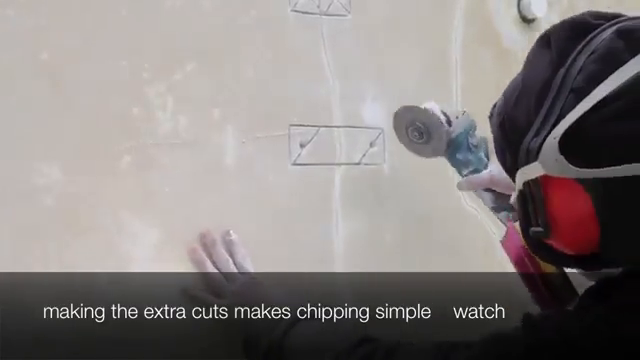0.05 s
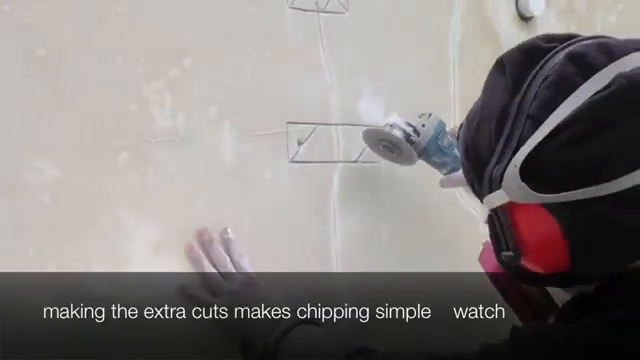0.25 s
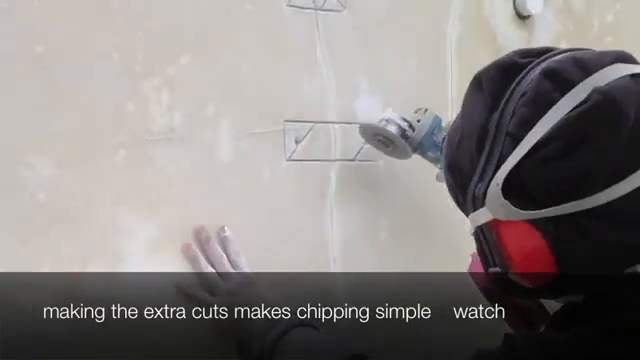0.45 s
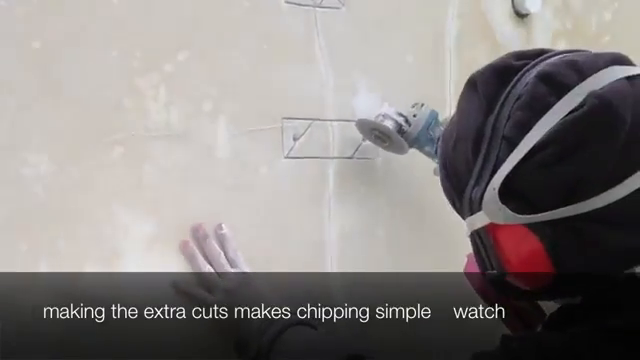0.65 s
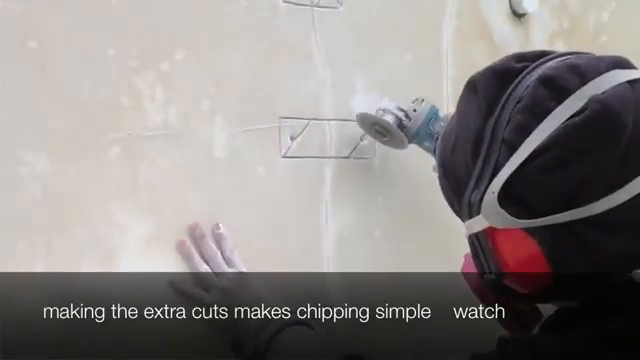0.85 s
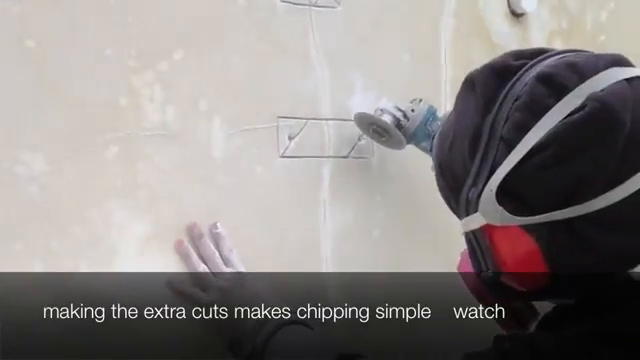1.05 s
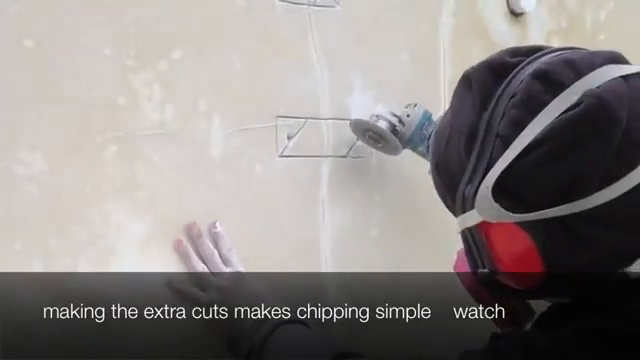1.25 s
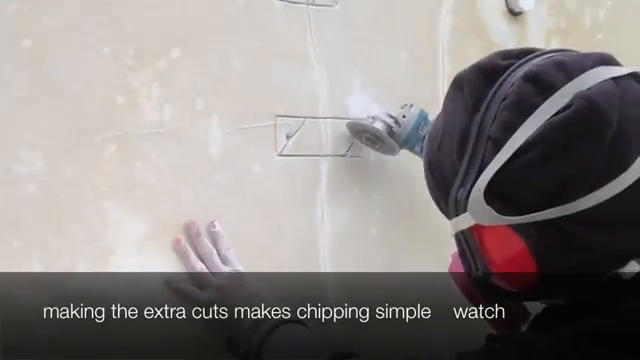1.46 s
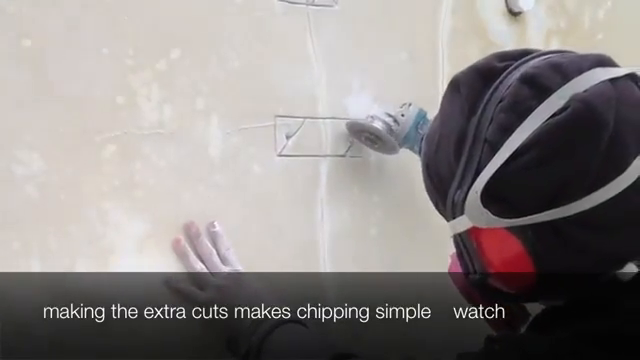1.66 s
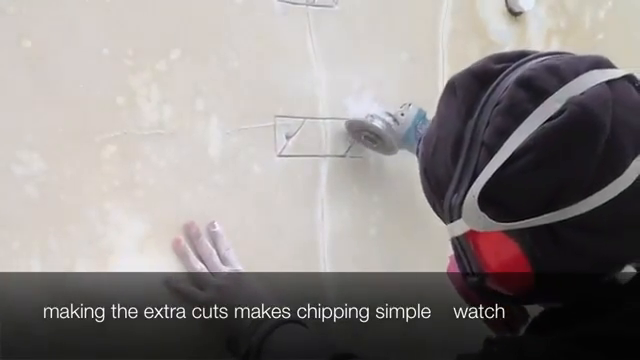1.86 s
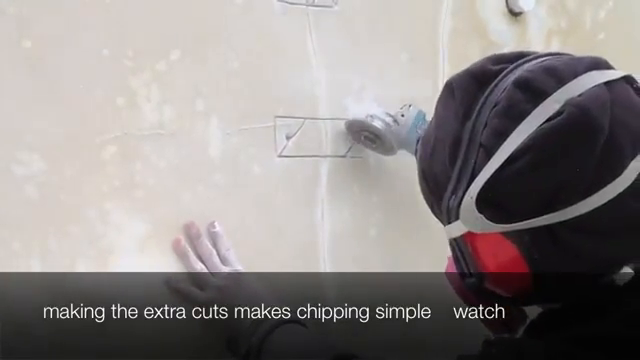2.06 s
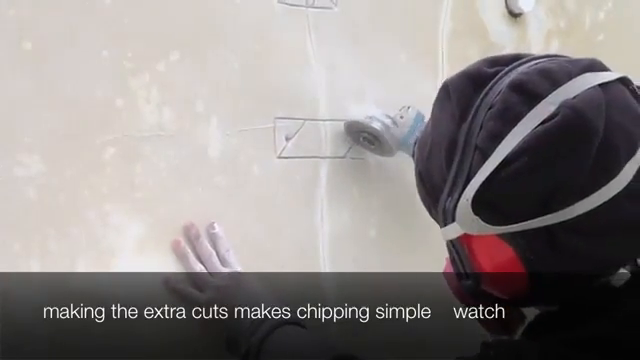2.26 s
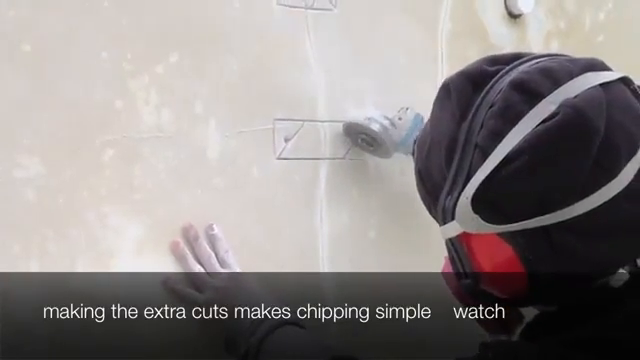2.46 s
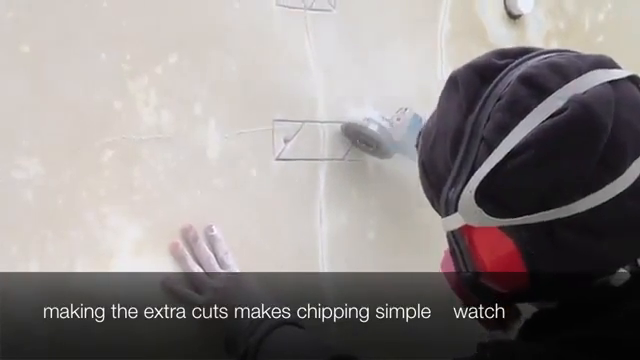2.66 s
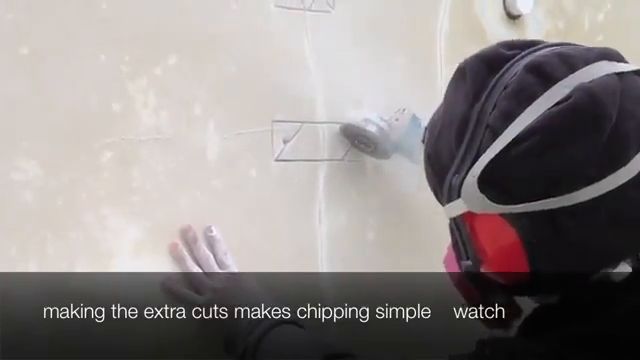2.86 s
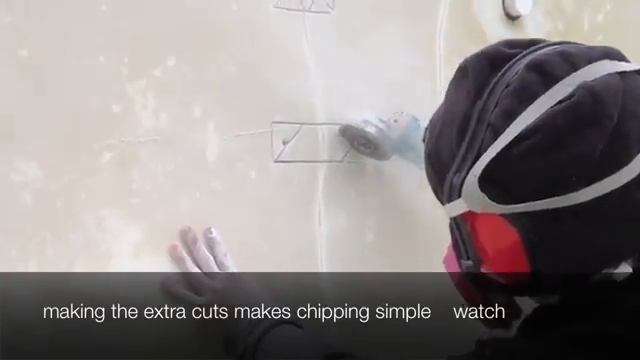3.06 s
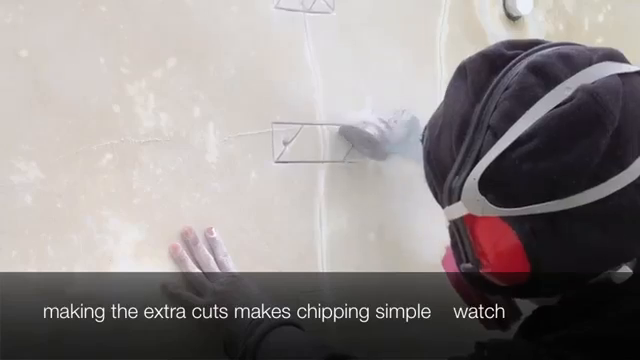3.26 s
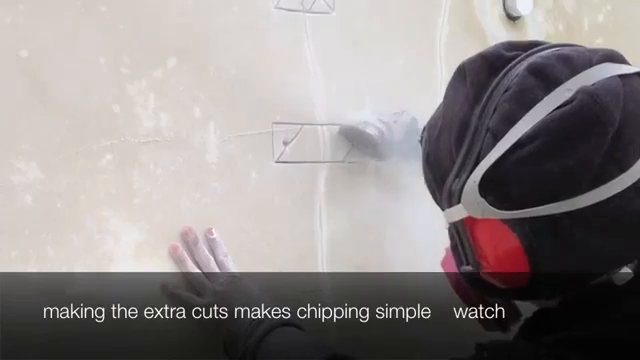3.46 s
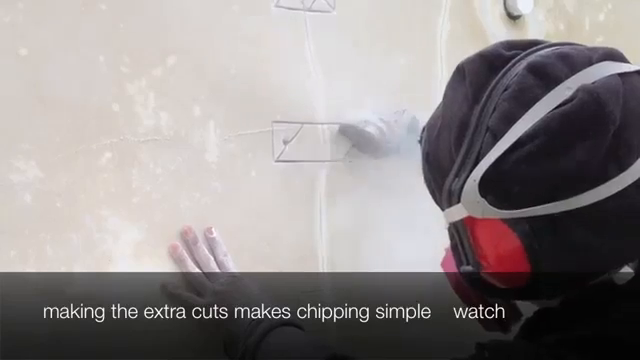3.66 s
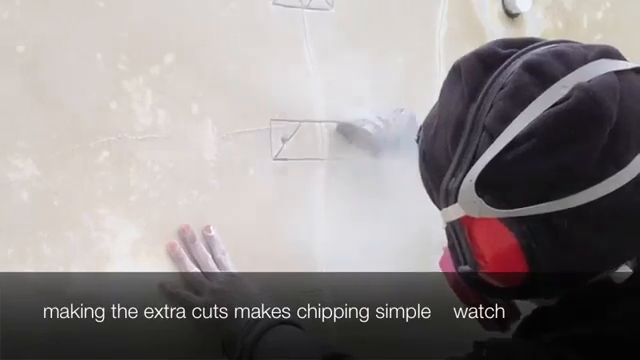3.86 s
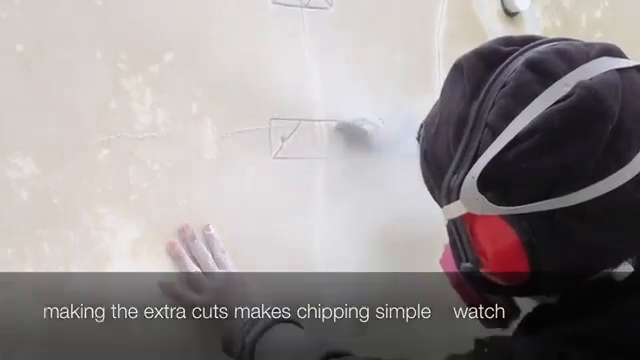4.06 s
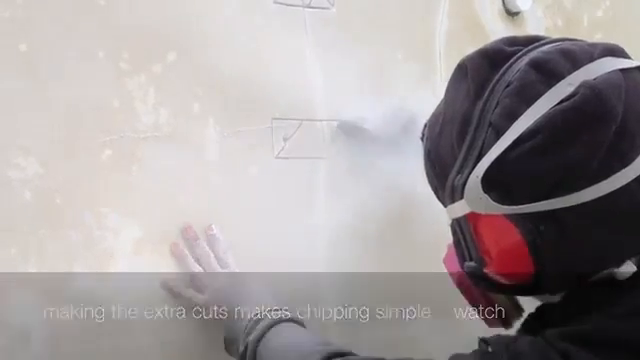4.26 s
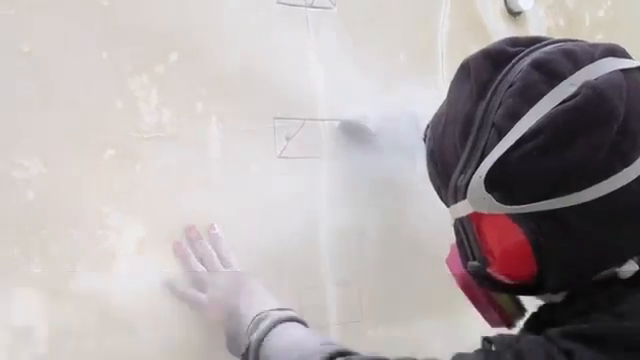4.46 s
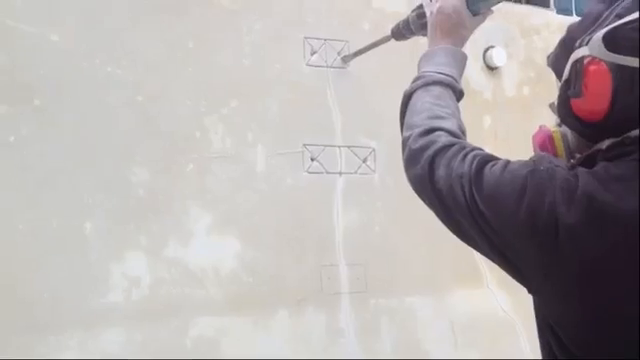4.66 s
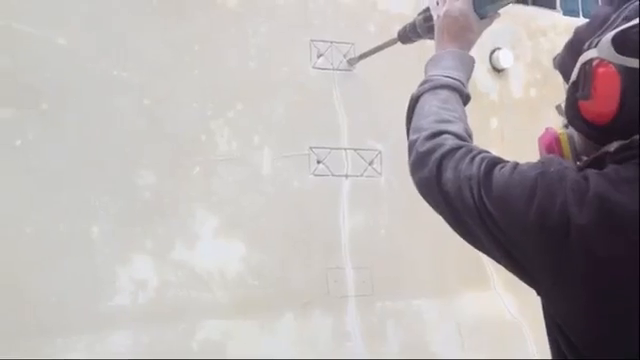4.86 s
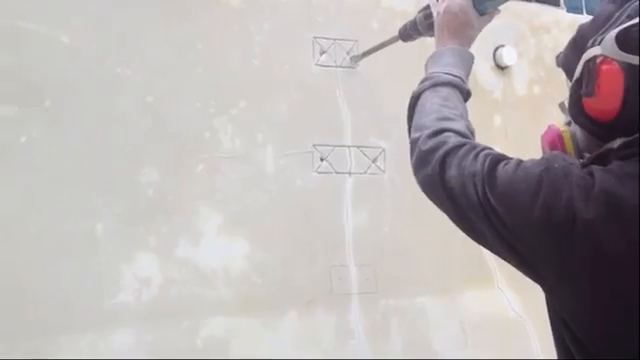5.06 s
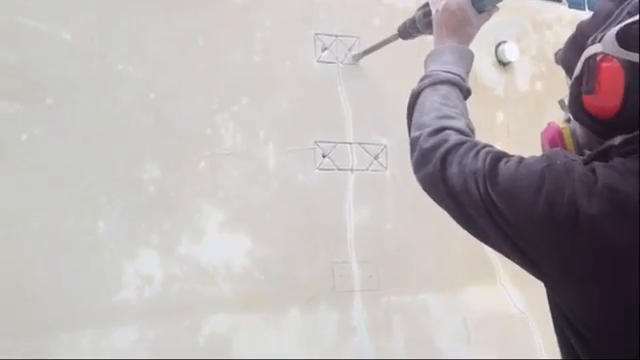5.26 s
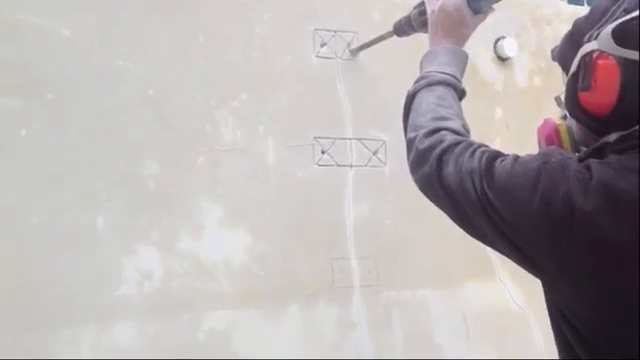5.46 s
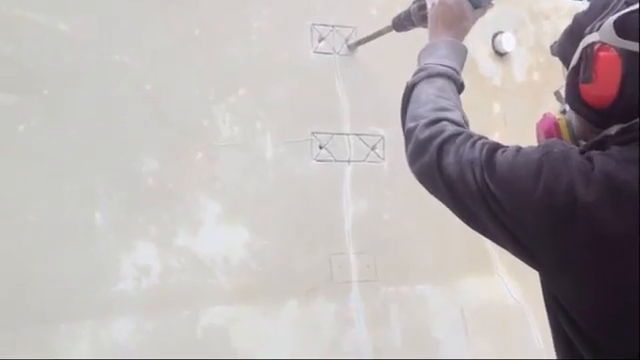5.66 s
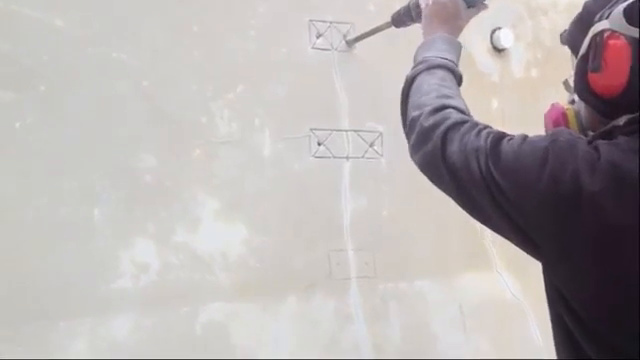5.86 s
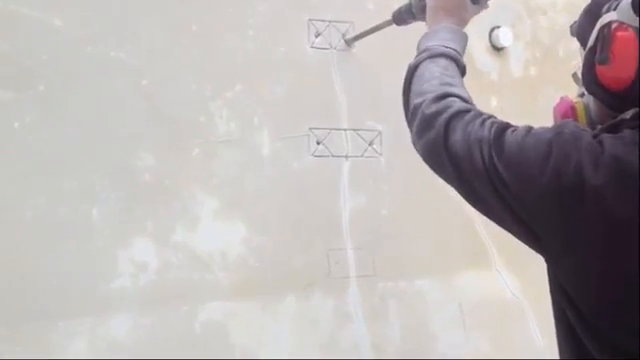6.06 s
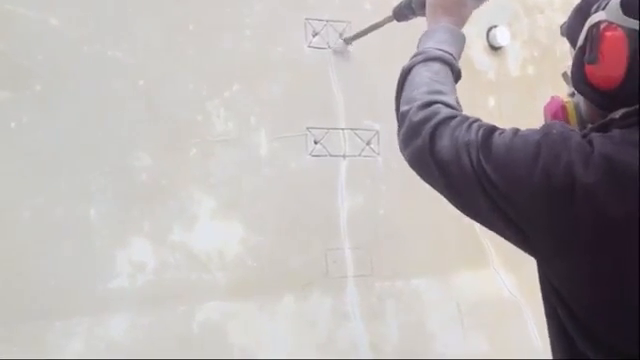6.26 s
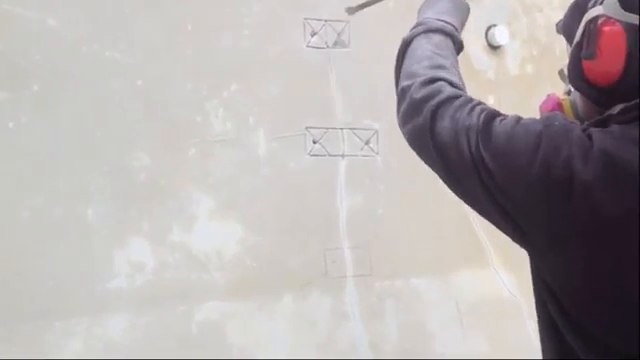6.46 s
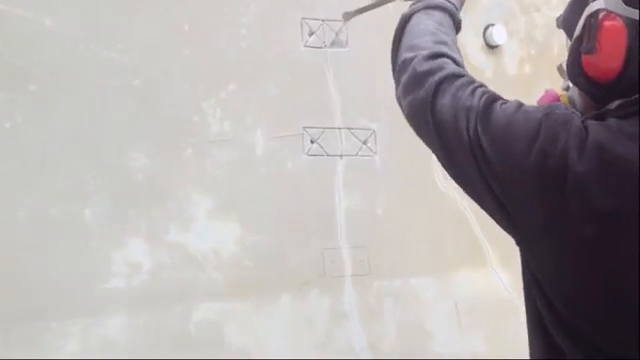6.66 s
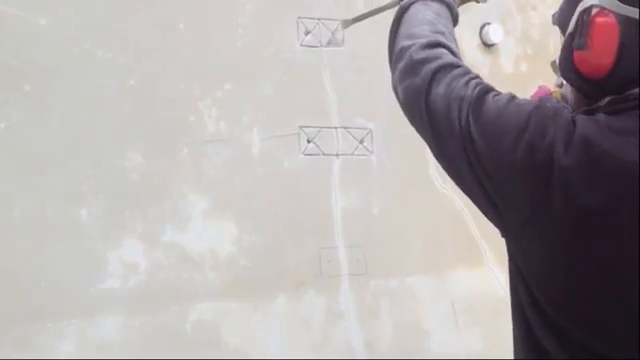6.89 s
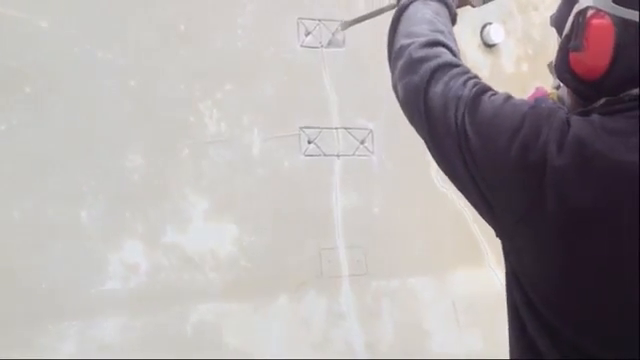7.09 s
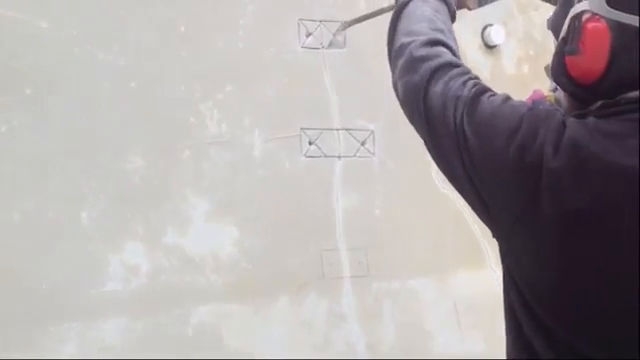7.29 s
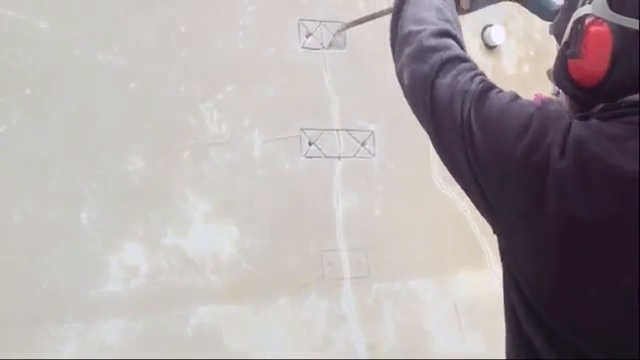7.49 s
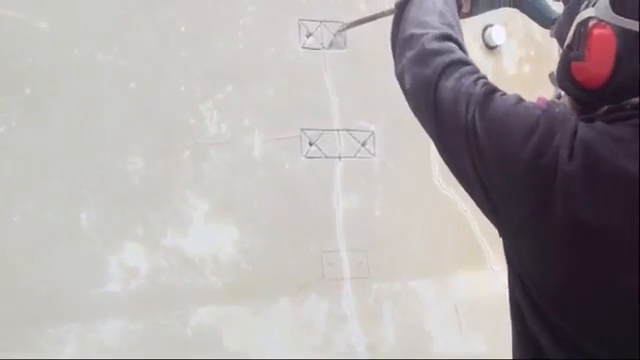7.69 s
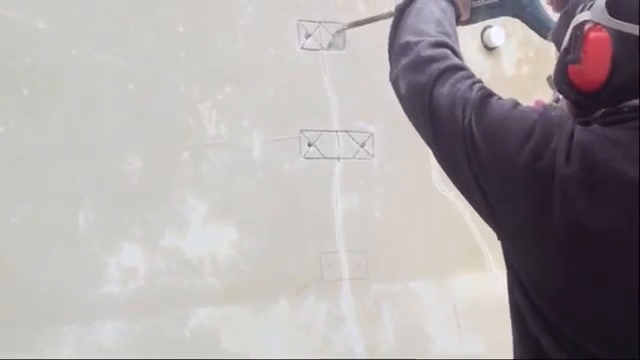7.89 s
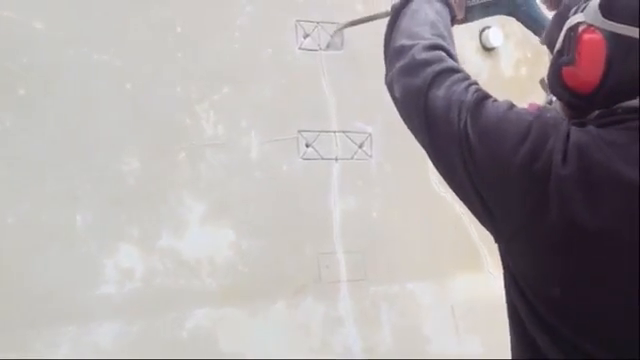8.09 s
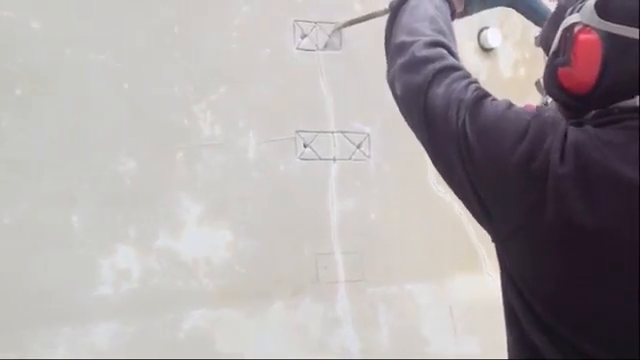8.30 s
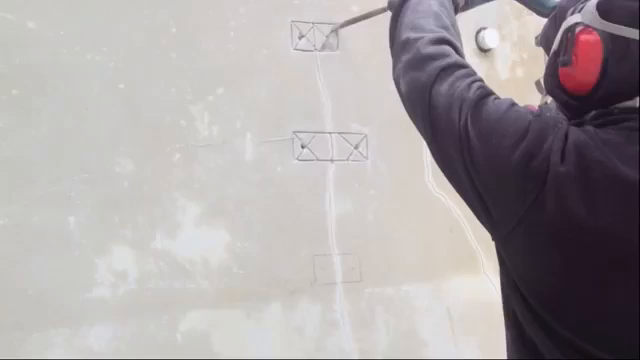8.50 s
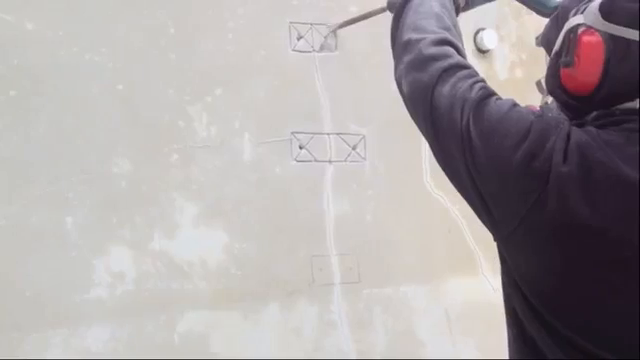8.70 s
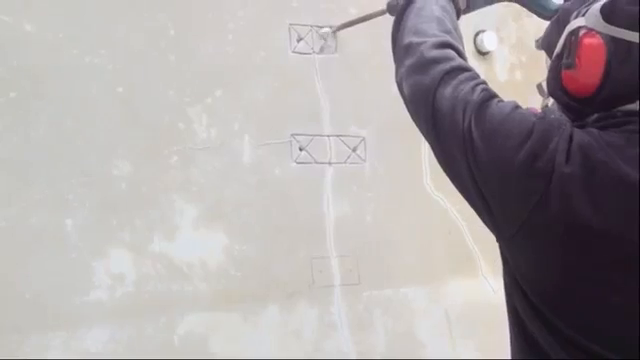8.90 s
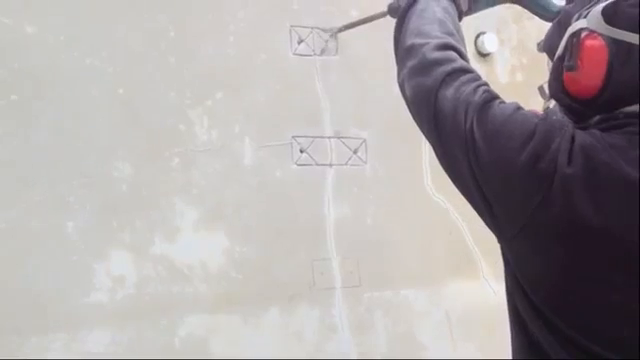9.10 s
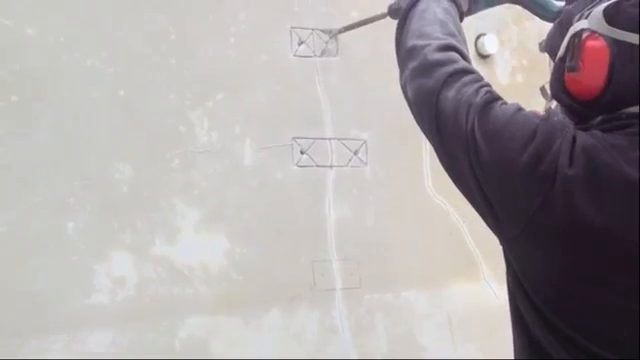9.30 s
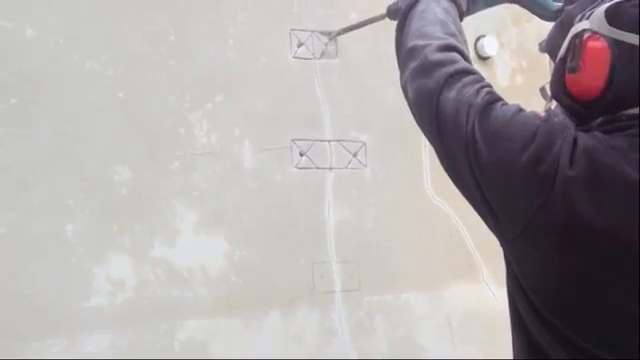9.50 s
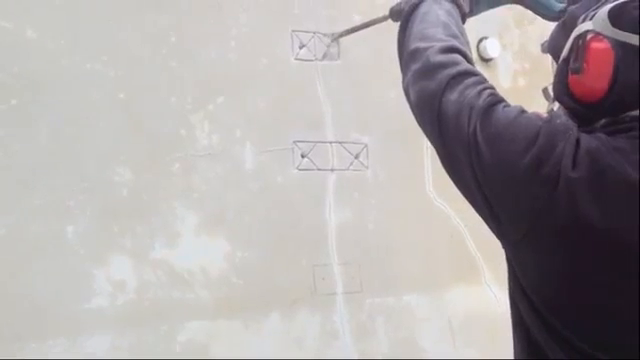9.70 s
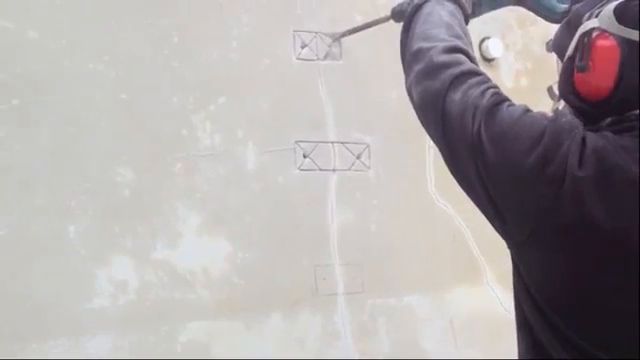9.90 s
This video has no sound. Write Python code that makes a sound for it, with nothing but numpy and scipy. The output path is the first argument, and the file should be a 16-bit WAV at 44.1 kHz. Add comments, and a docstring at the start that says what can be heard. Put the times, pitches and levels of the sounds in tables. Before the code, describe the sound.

Close, gritty grinder cutting sags in pitch under load, then cuts away to short rattling chisel-hammer bursts that coast down between quiet pauses and falling chips.

```python
"""An angle grinder runs fast, skimming the concrete wall of an empty pool, then bites in and slows down.
Its fan and motor are coloured noise and sines, its ringing disc is narrow bands of noise that follow
the spin, and its air blast buffets the close microphone with low, puffy noise. The grinder fades, and a
rotary hammer chisels in bursts: strokes trigger noise in the housing and steel chisel. After a burst it
coasts, at times to a stall; chips crack and drop, mostly while it rests, over a faint outdoor background."""
import sys
import numpy as np
from scipy import signal
from scipy.fft import rfft, irfft
from scipy.io import wavfile

SR = 44100
rng = np.random.default_rng(int(sys.argv[2]) if len(sys.argv) > 2 else 0)


def output_pcm(signal):
    """Save a mono or channel-first signal as 16-bit PCM at the path in sys.argv[1].

    Samples are clipped to [-1, 1] before scaling.
    """
    pcm = np.clip(np.atleast_2d(signal).T, -1, 1) * 32767
    wavfile.write(sys.argv[1], SR, np.round(pcm).astype(np.int16))


N = 438354
TIME = np.arange(N) / SR

# All levels in the tables are relative: later gains set the final loudness.
# Colour tables give the shape of a noise spectrum, with columns: pitch_hz, level_db (per Hz).

# grinder spindle speed before its slight waver: time_s, turns_per_s
SPINDLE = [(0, 166), (1.38, 156), (1.85, 150), (2.1, 125), (2.4, 120), (2.75, 113), (3.3, 96), (3.8, 91),
           (4.56, 82)]
BITE_S, FADE_S, SILENT_S = 1.385, 4.49, 4.56
# how hard the disc is fed into the cut: time_s, level_db
FEED = [(1.4, -19.5), (1.6, -16.5), (1.91, -17.5), (2.52, -14.5), (3.29, -17), (4.33, -15), (4.48, -18.5)]
# colour of the fan's rush: pitch_hz, level_db
RUSH_COLOUR = [(47, -76.5), (80, -60.5), (154, -25), (285, -24.5), (503, -21.5), (574, -15.5), (971, -13.5),
               (1110, -6.5), (1540, -8.5), (2440, 0.5), (5360, -2.5), (8120, -2), (11000, -5.5),
               (12300, -6), (15000, -6)]
# colour of the scrape in the cut: pitch_hz, level_db
CUT_COLOUR = [(290, -39), (500, -17), (1240, -12), (1770, -7), (2530, -8), (3050, -5), (5160, -4.5),
              (8250, -1.5), (8610, -3), (11800, -5), (12300, -7.5), (14200, 1.5), (15000, -8.5)]
# shaft, rotor and commutator tones: multiple_of_spindle_speed, level_db
GRINDER_TONES = [(1, -43.5), (2, -43), (3.7, -32), (7.77, -26), (38.9, -16.5), (44.4, -14.5)]
GEAR_TONES = [(5.05, -44.5), (7.05, -38), (20.25, -32.5)]
# ways the disc rings: pitch_hz (at 100 turns per s), shift_hz (per turn per s),
# width_hz (halfway through the cut), level_db (halfway), gain_db (over the whole cut)
DISC_MODES = [(1880, 0, 260, -15, 7), (3080, 1, 150, -17, -3), (5670, 0, 240, -14, 1),
              (6600, 0, 200, -15, 0), (7200, -4, 150, -14, 12), (7790, 3.6, 160, -6, -1),
              (8630, -3.2, 170, -6, 8), (9480, 3.2, 170, -5, 2), (10500, -4.7, 150, -8, 0),
              (11560, 4.6, 190, -7, -7), (12820, -6, 160, -14, -3), (14000, 7, 300, -4, 1)]
# the disc skims the wall before it bites and screeches in two resonances: pitch_hz, width_hz, level_db
SCREECH = [(2620, 80, -8), (2950, 170, -4)]
SKIM_S, SKIM_LENGTH_S = 0.18, 0.072
# level of fan and motor before the bite, what it loses under load, and how fast
FAN_DB, FAN_SAG_DB, FAN_SAG_S = -20.5, -6.5, 0.14
# the scrape starts weaker and grows as the slot deepens
SHALLOW_DB, DEEPEN_S = -3.5, 0.79

# colour of the air blast: pitch_hz, level_db
BLAST_COLOUR = [(25, -18), (60, -22.5), (110, -9), (180, -2), (400, -7.5), (900, -9), (1500, -15),
                (4000, -52.5)]
# hardest puffs of the blast: start_s, peak_db
PUFFS = [(1.841, -13.5), (1.934, -8), (2.008, -11.5), (2.062, -18), (2.122, -9.5), (2.394, -11.5),
         (2.514, -15.5), (2.554, -12), (2.738, -10.5), (2.85, -11), (2.954, -12), (3.045, -13), (3.129, -6),
         (3.418, -9.5), (3.569, -13), (3.689, -13.5), (4.019, -11)]
# the blast builds as the slot opens, then eases
BLAST_FROM_S, BLAST_RISE_S, BLAST_DB, BLAST_DB_PER_S = 1.632, 0.28, -28, -1.0

# pulls of the hammer's trigger: pressed_s, released_s, coasting_s (time constant after release)
TRIGGER = [(4.845, 5.0298, .3136), (5.1515, 5.207, .6648), (7.8108, 7.9362, .6541), (8.5707, 8.6863, .608),
           (8.9248, 8.9731, .7741), (9.4914, 10, .75)]
# how the chisel sits in the concrete on each pull: whirr_db, chisel_ring_db
SEATING = [(-23.5, -23.5), (-23.5, -21.5), (-23.5, -20), (-23, -21.5), (-21.5, -25.5), (-22.5, -20.5)]
# how hard the worker leans on the hammer, which sets the weight of the blows: time_s, level_db
LEAN = [(4.98, -26.5), (5.09, -28), (5.19, -24), (5.28, -32), (5.55, -23.5), (6.0, -24.5), (7.87, -26.5),
        (8.0, -25.5), (8.24, -27), (8.42, -27), (8.63, -24.5), (8.76, -30.5), (8.88, -22), (9.05, -25),
        (9.29, -21), (9.56, -23), (9.7, -24.5), (9.85, -32)]
# colour of the hammer's whirr: pitch_hz, level_db
WHIRR_COLOUR = [(59, -59), (100, -37), (213, -22.5), (241, -12), (399, -23.5), (607, -10.5), (904, -9),
                (1210, -1.5), (1400, -7), (1590, 2), (3050, -7.5), (6620, -1.5), (10100, -15.5),
                (12400, -9), (15000, -21)]
# colour of its blows: pitch_hz, level_db
BLOW_COLOUR = [(59, -63), (100, -35), (246, -12.5), (443, -17.5), (660, -6), (923, -16.5), (1730, 3),
               (2470, 0), (2750, -5.5), (3610, -9.5), (6480, 4.5), (10100, -14), (12400, -20), (13200, -8),
               (15000, -4.5)]
# colour of the piston's push through the housing: pitch_hz, level_db
THUMP_COLOUR = [(70, -28), (145, -7), (290, -2.5), (360, 3), (440, -15), (590, -0.5), (800, -9), (1500, 2),
                (3000, -17)]
# resonances of the hammer's housing: pitch_hz, width_hz, level_db
HOUSING = [(263, 67, -8.5), (644, 144, -6), (1760, 250, -34), (2793, 120, 0), (5340, 150, -6.5)]
# ringing of the steel chisel: pitch_hz, fade_s (time to fall by 60 dB), level_db
CHISEL = [(12095, 0.046, -1.5), (12520, 0.012, 0), (11660, 0.0094, -7.5)]
# full and stalling pace (strokes per s), spin-up time constant, crank at rest (share of a stroke)
TOP_PACE, STALL_PACE, SPIN_UP_S, CRANK_START = 74.446, 6.364, .0785, .347
# below these paces (strokes per s) a sound falls away, with this steepness (power of the pace)
WHIRR_KNEE, WHIRR_POWER = 31.6, 2.59
BLOW_KNEE, BLOW_POWER = 32.5, 3.23
RING_KNEE, RING_POWER = 38, 7.8
# the whirr swells under power; blows hit harder while the motor pulls up to speed
POWER_DB, KICK_DB, RING_KICK_DB = 1.5, 4.5, 6
# the first pull is a slow squeeze; by SEATED_S the chisel has found the wall and rings fully
SQUEEZE_FROM_S, SQUEEZE_TO_S, SEATED_S = 4.83, 4.954, 5.04
# the whirr is louder until the wall first loads the hammer
LOADED_S, UNLOADED_DB = 5.08, 4
# time constant of a blow crushing the concrete
CRUSH_S = .0023

# the chisel springs free and sings: start_s, peak_db
PINGS = [(5.3228, -1), (6.2217, -16), (9.8465, -2), (9.8604, -6), (9.9134, -6)]
# chips crack and drop: start_s (about 1 ms before the snap), peak_db, pitch_hz, lower_body (share)
CHIPS = [(4.654, -33, 3910, .4), (4.686, -37, 2050, .4), (6.714, -20.5, 4270, 0.83),
         (6.749, -31, 4730, 0.33), (6.891, -7, 4800, .05), (6.921, -28, 5500, .2), (6.943, -29, 7570, .2),
         (6.984, -18.5, 4200, 0.74), (7.002, -12, 1310, 0.4), (7.003, -15, 2280, 0.18),
         (7.071, -23, 6500, .3), (7.133, -14.5, 3700, 1), (7.26, -29, 2020, 0.38), (7.278, -25, 7840, .3),
         (7.329, -13.5, 4040, 0.9), (7.453, -27, 3000, .6), (7.464, -20.5, 4350, .4),
         (7.575, -31, 3960, .2), (7.607, -28.5, 4540, .3), (7.716, -30.5, 3760, .4), (7.763, -30, 4140, .4),
         (7.804, -27, 6010, .3), (7.84, -29, 2810, .4)]
# heavier lumps land on the pool floor: start_s, peak_db
LUMPS = [(7.003, -14.5), (7.456, -23)]
# colour of their thud: pitch_hz, level_db
LUMP_COLOUR = [(100, -27), (500, -7.5), (1200, -2), (2300, 0), (3300, -25), (8000, -22), (15000, -53)]
POOL_T60_S = 0.51

# colour of the quiet site: pitch_hz, level_db
SITE_COLOUR = [(24, -53), (40, -30), (173, 10), (612, -5), (1960, 0), (3140, -12), (4230, -4), (7680, -20),
               (9600, -28), (12300, -11), (15000, -20)]
SITE_DB = -60.5
# grit runs down the wall: thickest_s, half_length_s, level_db
TRICKLES = [(4.704, 0.12, -52), (6.9, .2, -62), (7.52, 0.19, -56.5)]
# colour of the grit: pitch_hz, level_db
GRIT_COLOUR = [(300, -7.5), (2000, -5), (5000, -2), (8000, -4.5), (10000, -23), (15000, -14)]
CUTOFF_HZ = 15100


def grinder(rush_db=5.5, loaded_rush_db=-7, cut_db=-1, disc_db=-4, rub_depth=0.093, chatter_db=1.5,
            flutter_db=1.0, waver=0.00196, notch_hz=12330, notch_width_hz=750, notch_depth=.65,
            low_cut_hz=70):
    """Fan rush and motor tones; once the disc bites, grit scrapes and sets the spinning disc ringing."""
    speed = in_time(SPINDLE)[0] * (1 + waver * drift(14))
    turns = np.cumsum(speed) / SR
    in_cut_s = np.maximum(TIME - BITE_S, 0)
    feed = from_db(in_time(FEED)[0])
    fan = from_db(FAN_DB + FAN_SAG_DB * (1 - np.exp(-in_cut_s / FAN_SAG_S)))
    cutting = feed * from_db(SHALLOW_DB * np.exp(-in_cut_s / DEEPEN_S))
    biting = ramp(BITE_S - .01, BITE_S + 0.03)

    # each motor tone flickers in level on its own
    tones = sum(spin_tone(multiple, db, turns) * from_db(3.5 * drift(40)) for multiple, db in GRINDER_TONES)
    loading = biting * np.exp(-np.abs(TIME - BITE_S - .15) / 0.081)
    gears = loading * sum(spin_tone(multiple, db, turns) for multiple, db in GEAR_TONES)

    rush = colour(noise() * from_db(flutter_db * drift(300)), RUSH_COLOUR)
    rush = rush * from_db(rush_db + loaded_rush_db * biting)
    rush = signal.sosfilt(signal.butter(2, low_cut_hz, "high", fs=SR, output="sos"), rush)

    skim = np.exp(-((TIME - SKIM_S) / SKIM_LENGTH_S) ** 2)
    screech = skim * sum(from_db(db) * resonate(noise(), hz, width_hz) for hz, width_hz, db in SCREECH)

    # the rim's rub varies once and twice a turn, and it skips on the stones in the concrete
    rub = 1 + rub_depth * (np.cos(2 * np.pi * turns) + np.sin(4 * np.pi * turns))
    contact = biting * rub * from_db(chatter_db * drift(220))
    scrape = from_db(cut_db) * cutting * colour(noise() * contact, CUT_COLOUR)
    disc = from_db(disc_db) * feed * contact * spinning_disc(turns)
    sound = fan * (rush + tones) + gears + screech + scrape + disc
    # a narrow hollow lies in the treble
    return sound - notch_depth * resonate(sound, notch_hz, notch_width_hz)


def spin_tone(multiple, db, turns):
    """A sine locked to the spindle, so its pitch falls as the grinder slows."""
    return from_db(db) * np.sqrt(2) * np.sin(2 * np.pi * multiple * turns)


def spinning_disc(turns, slot_damping=1.1, wander_db=1.0, wobble_hz=25):
    """Narrow bands of bending waves, driven by grit; the deeper the slot, the more it damps them."""
    # -0.5 at the bite, +0.5 at the end of the cut
    depth = ramp(BITE_S, FADE_S) - .5
    # the hand rocks the disc in the slot, which bends all its modes together
    rocking = wobble_hz * np.cumsum(drift(6)) / SR
    out = 0
    for hz, shift, width_hz, db, deep_db in DISC_MODES:
        width = width_hz * np.exp(slot_damping * depth)
        swell = drift(2 * width) + 1j * drift(2 * width)
        # waves running with the spin sound higher, waves running against it lower
        cycles = hz * TIME + shift * (turns - 100 * TIME) + rocking
        level = from_db(db + deep_db * depth + wander_db * drift(7.6))
        out = out + level * np.real(swell * np.exp(2j * np.pi * cycles))
    return out


def air_blast(level_db=-6, lump_db=2.5, gust_db=-5.0, gusts_per_s=70, spread_db=3.5, puff_db=1.0,
              puff_s=0.0032):
    """Air and dust flung from the disc hit the microphone: a lumpy stream, small gusts and hard puffs."""
    stream = from_db(level_db) * rms_one(noise() * from_db(lump_db * drift(110)))
    arrivals = (rng.random(N) < gusts_per_s / SR) * from_db(spread_db * noise().clip(-2, 1))
    gusts = from_db(gust_db) * rms_one(die_away(arrivals, puff_s) * noise())
    strength = from_db(BLAST_DB + BLAST_DB_PER_S * (TIME - BLAST_FROM_S))
    strength = strength * ramp(BLAST_FROM_S, BLAST_FROM_S + BLAST_RISE_S)
    strength = strength * (1 - ramp(FADE_S - .08, SILENT_S))
    puffs = from_db(puff_db) * bursts(PUFFS, puff_s)
    return colour(strength * (stream + gusts) + puffs, BLAST_COLOUR)


def hammer(whirr_db=-1.68, blow_db=.8, ring_db=-4.0, knock_db=-15, uneven_db=0.66, rise_s=0.00038,
           return_share=.62, rattle_db=2.0, crack_db=15, thump_db=-20, thump_pace=60,
           coast_knock_db=1.0, whine_order=143, whine_db=-17):
    """Each piston stroke shakes the housing, crushes concrete and rings the chisel; the motor whines."""
    pace, power = motor()
    whirr, blow, ring = effort(pace, power)
    strokes, rate = CRANK_START + np.cumsum(pace) / SR, pace.clip(10)
    stroke = np.arange(1, strokes[-1])
    force = from_db(uneven_db * rng.standard_normal((len(stroke), 2)))
    hits = clicks(np.interp(stroke, strokes, TIME) - rise_s, force[:, 0])
    # the striker knocks back part way through each stroke, harder when the motor coasts
    knock_place = stroke + return_share + rng.normal(0, 0.041, len(stroke))
    knocks = clicks(np.interp(knock_place, strokes, TIME), force[:, 1])

    # a contact builds up and crumbles within a few ms; slow strokes stand further out of their mean level
    contacts = die_away(die_away(np.array([hits, knocks]), CRUSH_S), rise_s) / (rise_s * SR)
    crush, knock = contacts * np.sqrt(2 / (rate * CRUSH_S))
    blows = colour(from_db(blow_db) * blow * crush * noise(), BLOW_COLOUR)
    # first contact is a hard crack that dies away with a 0.7 ms time constant
    crack = die_away(hits, .0007) * noise()
    blows = blows + from_db(crack_db) * blow * colour(crack, BLOW_COLOUR)

    steel = 0
    for hz, t60, db in CHISEL:
        mode = resonate(crush * noise(), hz, np.log(1000) / (np.pi * t60))
        # slower-dying modes are narrower, so they are lifted to match
        steel = steel + from_db(db) * mode * np.sqrt(t60 * SR / np.log(1000))

    knocking = from_db(knock_db + coast_knock_db * (1.5 - power)) * knock
    gears = colour(noise() * (from_db(rattle_db * drift(500)) + knocking), WHIRR_COLOUR)
    # the same push every stroke gives a low buzz that climbs with the pace
    thump = from_db(thump_db) * colour(hits * np.sqrt(SR / rate) * rate / thump_pace, THUMP_COLOUR)
    whine_hz = whine_order * rate * (1 + 0.0086 * drift(400))
    whine = from_db(whine_db) * np.sin(2 * np.pi * np.cumsum(whine_hz) / SR)
    body = blows + from_db(whirr_db) * whirr * (gears + whine + thump)
    body = body + sum(from_db(db) * resonate(body, hz, width_hz) for hz, width_hz, db in HOUSING)
    return body + from_db(ring_db) * ring * steel


def motor():
    """Pace (strokes per s) and power (1 or 0): climbs while the trigger is held, then coasts until it stalls."""
    pace, power = np.zeros(N), np.zeros(N)
    for pressed, released, coast_s in TRIGGER:
        at = int(pressed * SR)
        t = TIME[at:]
        held_s = np.minimum(t, released) - t[0]
        driven = TOP_PACE + (pace[at] - TOP_PACE) * np.exp(-held_s / SPIN_UP_S)
        coasting = driven * np.exp(-np.maximum(t - released, 0) / coast_s)
        power[at:] = t < released
        pace[at:] = coasting * ((t < released) | (coasting > STALL_PACE))
    return pace, power


def effort(pace, power, settle_s=.04):
    """Gains of whirr, blow and chisel ring, from the pace, power, lean and seating of the chisel."""
    pull = np.maximum(np.searchsorted([row[0] for row in TRIGGER], TIME) - 1, 0)
    whirr_db, ring_db = lag(np.array(SEATING)[pull].T, settle_s)
    torque = lag(power * (1 - pace / TOP_PACE), settle_s)
    squeeze = ramp(SQUEEZE_FROM_S, SQUEEZE_TO_S)
    whirr_db = whirr_db + UNLOADED_DB * (1 - ramp(LOADED_S - .01, LOADED_S + .015))
    whirr = from_db(whirr_db + POWER_DB * lag(power, settle_s))
    whirr = whirr * falls_away(pace, WHIRR_KNEE, WHIRR_POWER) * squeeze
    blow = from_db(in_time(LEAN)[0] + KICK_DB * torque)
    blow = blow * falls_away(pace, BLOW_KNEE, BLOW_POWER) * squeeze ** 2
    seated = ramp(SEATED_S - .1, SEATED_S) ** 2
    ring = from_db(ring_db + RING_KICK_DB * torque) * falls_away(pace, RING_KNEE, RING_POWER) * seated
    return whirr, blow, ring


def falls_away(pace, knee, power):
    """Near 1 at a fast pace, dropping as a power of the pace below the knee."""
    return 1 / (1 + (knee / np.maximum(pace, 1e-3)) ** power)


def pings(level_db=-4, ring_s=0.0083, beat=0.46):
    """Unloaded, the chisel rings on in its two main modes, which beat."""
    s, db = np.transpose(PINGS)
    main_hz, second_hz = CHISEL[0][0], CHISEL[1][0]
    tone = np.sin(2 * np.pi * main_hz * TIME) + beat * np.sin(2 * np.pi * second_hz * TIME)
    return die_away(clicks(s, from_db(db + level_db)), ring_s) * tone


def chips(level_db=1, width_share=0.39, crumble=0.063, crumble_s=0.0035, size=2048):
    """Each chip is a sharp snap in a broad resonance with some lower body, then a few ms of crumbling."""
    out = np.zeros(N)
    for s, db, hz, body in CHIPS:
        width_hz = width_share * hz
        snap = crumble * rng.standard_normal(size) * np.exp(-TIME[:size] / crumble_s)
        snap[0] = 1
        snap = resonate(snap, hz, width_hz) + body * resonate(snap, hz / 2, width_hz)
        snap = resonate(snap, hz, 2 * width_hz)
        at = int((s + 0.00101) * SR)
        out[at:at + size] += from_db(db + level_db) * snap / np.abs(snap).max()
    return out


def lumps():
    """Heavier lumps thud on the floor: short, dying puffs of coloured noise."""
    return colour(bursts(LUMPS, decay_s=0.0024), LUMP_COLOUR)


def pool(x, wet_db, wall_hz=5000, gap_s=.012):
    """Adds dull, dense reflections from the concrete basin: a dying noise tail after a short gap."""
    t = TIME[:SR]
    tail = rng.standard_normal(SR) * from_db(-60 * t / POOL_T60_S) * (t > gap_s)
    tail = tail / np.linalg.norm(tail)
    tail = signal.sosfilt(signal.butter(2, min(wall_hz, SR / 3), fs=SR, output="sos"), tail)
    return x + from_db(wet_db) * signal.oaconvolve(x, tail)[:N]


def site(grain_db=3.0):
    """Faint outdoor background noise, with grainy noise for grit trickling down the wall."""
    flow = sum(from_db(db) * np.exp(-((TIME - s) / half_s) ** 2 / 2) for s, half_s, db in TRICKLES)
    grit = flow * colour(rms_one(noise() * from_db(grain_db * drift(1200))), GRIT_COLOUR)
    return from_db(SITE_DB) * colour(noise(), SITE_COLOUR) + grit


def from_db(db):
    """Decibels to gain."""
    return 10 ** (np.asarray(db) / 20)


def rms_one(x):
    """Scale to unit power."""
    return x / np.sqrt(np.mean(np.abs(x) ** 2) + 1e-20)


def in_time(rows):
    """Each column of a curve table, sample by sample."""
    s, *columns = np.transpose(rows)
    return [np.interp(TIME, s, c) for c in columns]


def ramp(start, end):
    """Rises from 0 to 1 between two times."""
    return np.clip((TIME - start) / max(end - start, 1 / SR), 0, 1)


def lag(x, seconds):
    """Follows x with a time constant."""
    r = np.exp(-1 / (seconds * SR))
    return signal.lfilter([1 - r], [1, -r], x + 1e-18)


def noise():
    """White noise."""
    return rng.standard_normal(N)


def drift(rate):
    """Smooth random curve of unit power that changes rate times a second; the rate may vary."""
    place = np.cumsum(np.broadcast_to(rate, N)) / SR
    return rms_one(np.interp(place, np.arange(N), rng.standard_normal(N)))


def colour(x, spectrum, size=4096):
    """Filter with the given spectrum and no sound ahead of time; white noise keeps its power."""
    hz, db = np.transpose(spectrum)
    grid = np.linspace(1, SR / 2, size // 2 + 1)
    cepstrum = irfft(np.log(from_db(np.interp(np.log(grid), np.log(hz), db))))
    # fold the cepstrum so that the response starts at once (minimum phase)
    cepstrum[1:size // 2] *= 2
    cepstrum[size // 2 + 1:] = 0
    response = irfft(np.exp(rfft(cepstrum)))
    return signal.oaconvolve(x, response / np.linalg.norm(response))[:N]


def resonate(x, hz, width_hz):
    """One resonance, gain about 1 at its top."""
    r = np.exp(-np.pi * width_hz / SR)
    feedback = [1, -2 * r * np.cos(2 * np.pi * hz / SR), r * r]
    return signal.lfilter(np.array([1, 0, -1]) * (1 - r * r) / 2, feedback, x + 1e-18)


def clicks(times, heights):
    """Single-sample impulses."""
    out = np.zeros(N)
    np.add.at(out, np.clip(np.asarray(times) * SR, 0, N - 1).astype(int), heights)
    return out


def die_away(x, decay_s):
    """Each impulse becomes an exponential tail of the same height."""
    return signal.lfilter([1], [1, -np.exp(-1 / (decay_s * SR))], x + 1e-18)


def bursts(rows, decay_s):
    """A dying puff of noise for each row: start_s, peak_db."""
    s, db = np.transpose(rows)
    return die_away(clicks(s, from_db(db)), decay_s) * noise() / 2


def scene():
    """The grinder fades out, the hammer follows; both channels are alike."""
    cutting = (grinder() + air_blast()) * (1 - ramp(FADE_S, SILENT_S))
    debris = pool(chips(), wet_db=-24) + pool(lumps(), wet_db=-4.0)
    chiselling = pool(hammer(), wet_db=-11) + pings() + debris
    background = site() * ramp(SILENT_S - .03, SILENT_S + 0.13)
    mono = cutting + chiselling + background
    return np.array([mono, mono])


def record(dry):
    """Peaks are rounded and the top is cut steeply."""
    top = 0.97
    rounded = top * np.tanh(dry / top)
    return signal.sosfilt(signal.ellip(12, .1, 80, CUTOFF_HZ, fs=SR, output="sos"), rounded)


dry = scene()
out = record(dry)
output_pcm(out)
```